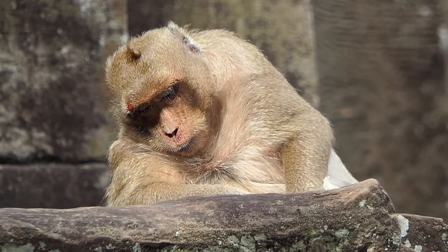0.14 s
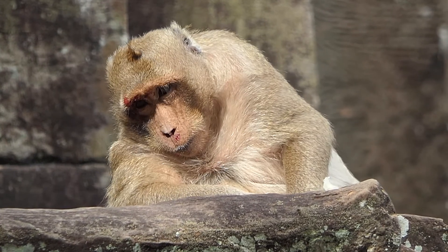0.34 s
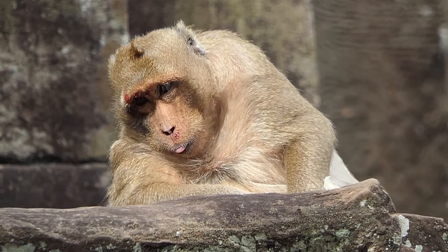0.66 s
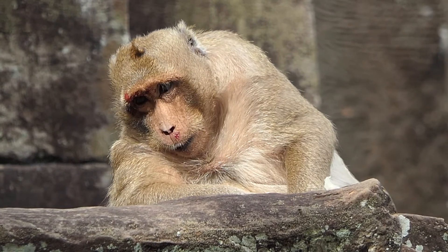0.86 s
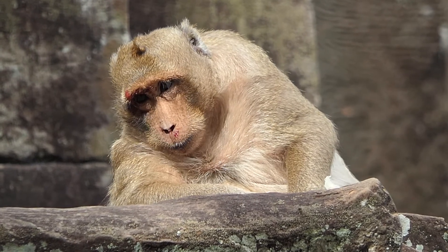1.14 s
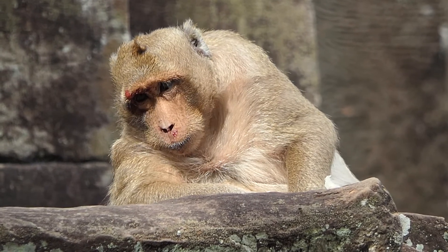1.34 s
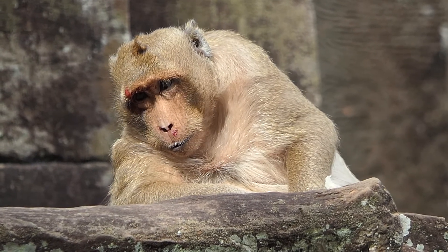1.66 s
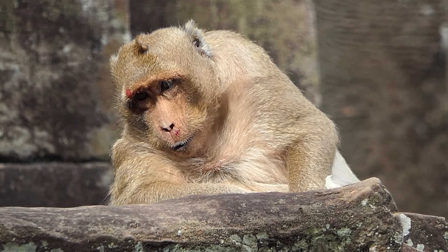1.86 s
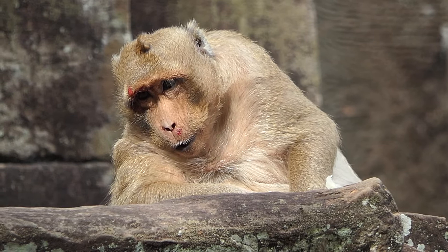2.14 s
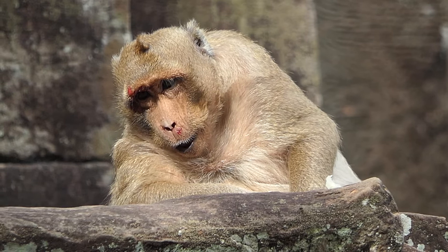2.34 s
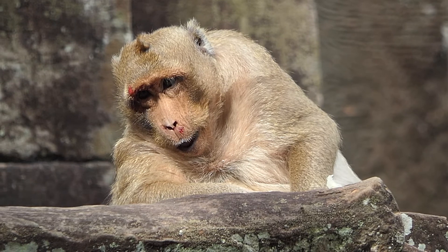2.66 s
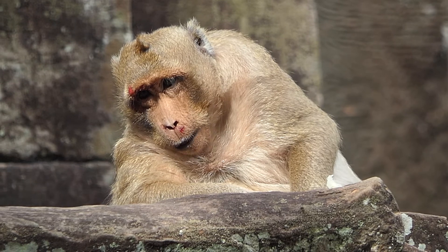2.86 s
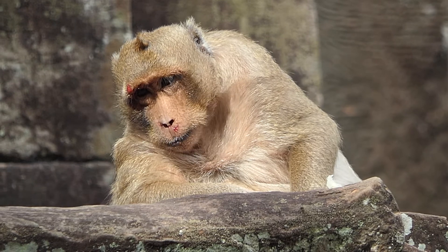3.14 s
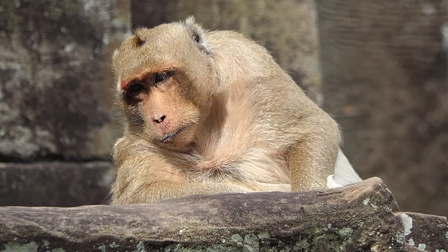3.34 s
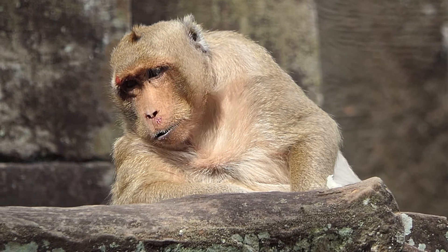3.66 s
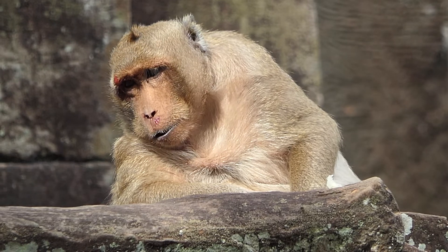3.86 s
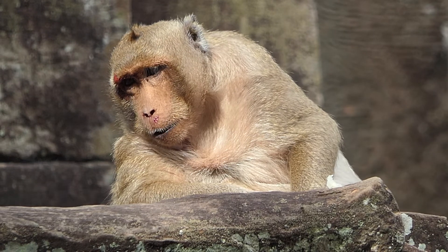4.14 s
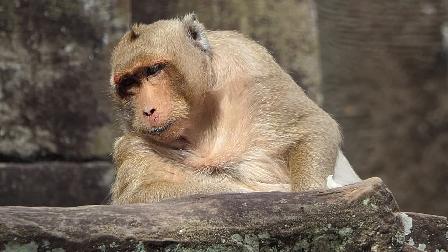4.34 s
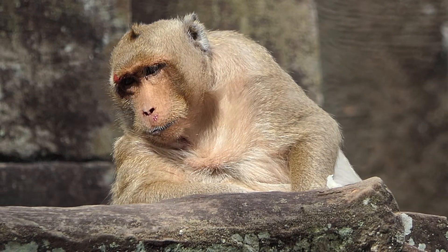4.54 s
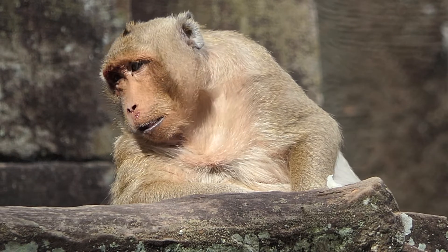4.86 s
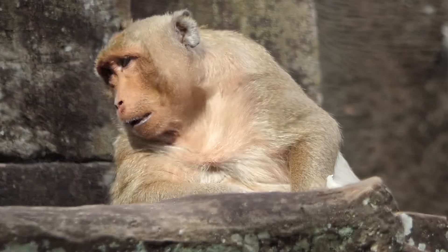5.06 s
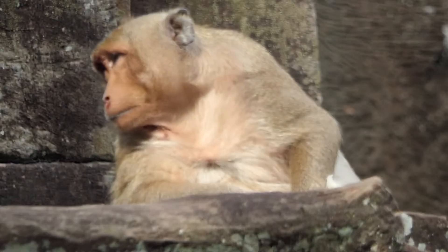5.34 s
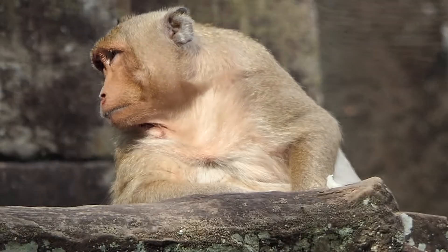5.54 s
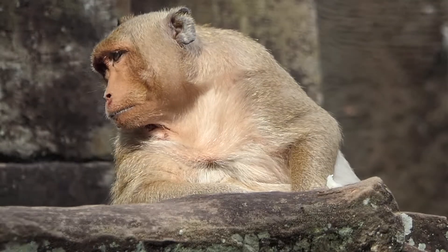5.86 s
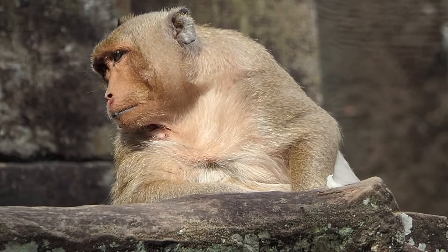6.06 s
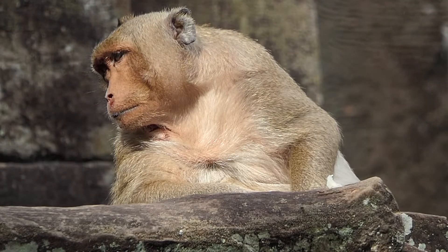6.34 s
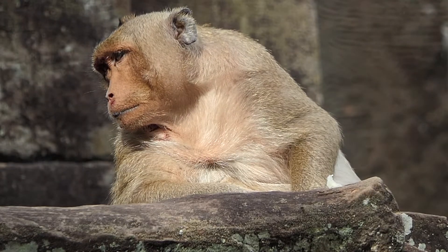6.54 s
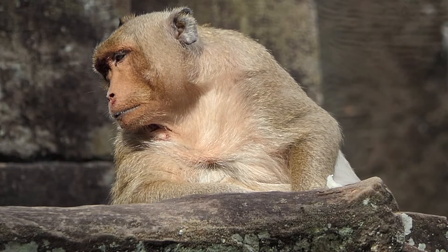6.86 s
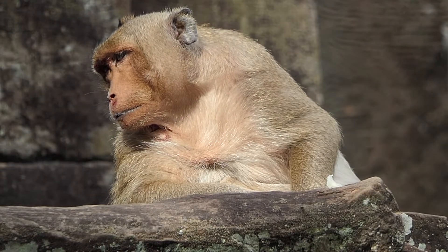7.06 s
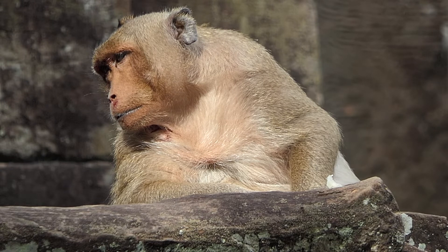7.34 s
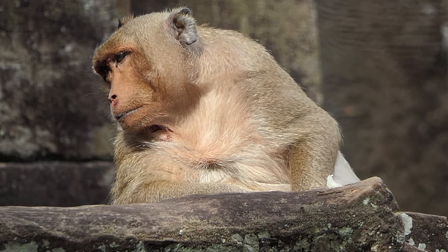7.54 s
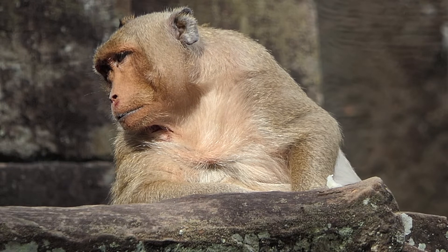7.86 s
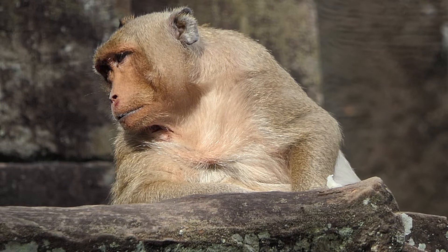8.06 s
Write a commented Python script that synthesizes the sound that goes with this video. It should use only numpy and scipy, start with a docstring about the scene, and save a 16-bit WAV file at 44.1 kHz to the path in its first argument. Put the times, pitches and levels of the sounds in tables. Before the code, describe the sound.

A bird repeats short down-and-up calls over soft leafy hiss and far hum, while something dry rustles and snaps close by.

```python
"""The tail of a bird call dies away under a dry rustle; then ticks, a distant pipe and more near calls follow.
The calls are thin down-and-up whistles: swept tones, blurred by leaves and smeared by echoes off walls and
trees. Piping, gliding notes (mostly faint, with a loud run near the end), some perhaps birds, and a hoarse
animal (trembling tones) sound further off. Knocks are damped modes; rustle and ticks are shaped noise near the
microphones. Traffic hum, forest air and a faint broad noise that differs between the sides are filtered noise."""
import sys
import numpy as np
from scipy import signal
from scipy.fft import rfft, irfft
from scipy.io import wavfile
from scipy.ndimage import uniform_filter1d

SR = 44100
rng = np.random.default_rng(int(sys.argv[2]) if len(sys.argv) > 2 else 0)


def transcribe(u):
    """Save the signal u as a 16-bit wav file named by the first command-line argument.

    u: samples, shape (n,) or (channels, n), limited to [-1, 1]; the rate is SR.
    q: integer samples, one column per channel.
    """
    v = np.clip(np.atleast_2d(u).T, -1, 1)
    q = np.round(v * 32767).astype(np.int16)
    wavfile.write(sys.argv[1], SR, q)


N = 361619
TIME_S = np.arange(N) / SR
FREQ_HZ = np.arange(N // 2 + 1) * SR / N


def undb(db):
    """Decibels to gain."""
    return 10 ** (np.asarray(db) / 20)


def unit(x):
    """Scale to rms 1."""
    return x / np.sqrt(np.mean(x ** 2))


def noise():
    """White noise for the whole scene."""
    return rng.standard_normal(N)


def colour(x, spectrum):
    """Filter by a (Hz, dB) spectrum that falls 10 dB per octave beyond its ends; rms 1."""
    hz, db = np.transpose(spectrum)
    point_octave, octave = np.log2(hz), np.log2(FREQ_HZ + 1)
    octaves_beyond = np.abs(octave - np.clip(octave, point_octave[0], point_octave[-1]))
    gain = undb(np.interp(octave, point_octave, db) - 10 * octaves_beyond)
    return unit(irfft(rfft(x) * gain, N))


def level_at(points):
    """Interpolate (s, dB) points over the scene."""
    return np.interp(TIME_S, *np.transpose(points))


def walk(rate_hz):
    """Random levels held 1 / rate_hz s and slewed twice; spread near 1."""
    hold = int(SR / rate_hz)
    steps = np.repeat(rng.standard_normal(N // hold + 1), hold)
    slewed = uniform_filter1d(uniform_filter1d(steps, hold), hold)
    return unit(slewed[:N])


def quiver(count, size):
    """Fast random flutter, spread near 1: noise averaged twice over size samples."""
    smooth = uniform_filter1d(uniform_filter1d(rng.standard_normal(SR), size), size)
    return unit(smooth)[:count]


def add(out, start_s, sound):
    """Mix a sound in at a time."""
    i = int(start_s * SR)
    out[i:i + len(sound)] += sound[:len(out) - i]


def surroundings(x, wet_db, t60_s, build_s, echo_db, count=14):
    """What comes back: a few distinct echoes off walls, then dense scatter from trunks and leaves."""
    t = TIME_S[:SR]
    scatter = rng.standard_normal(SR) * (1 - np.exp(-t / build_s)) * undb(-60 * t / t60_s)
    lag_s = 0.0068 + 0.12 * (np.arange(count) + rng.random(count)) / count
    echoes = np.zeros(SR)
    echoes[(lag_s * SR).astype(int)] = rng.choice([-1, 1], count) * undb(-60 * lag_s / t60_s)
    response = undb(wet_db) * scatter / np.linalg.norm(scatter)
    response += undb(echo_db) * echoes / np.linalg.norm(echoes)
    return signal.fftconvolve(x, response)[:len(x)]


def whistle(hz, gain, waver, flutter_db=3.0, octave_db=-35):
    """A nearly pure tone that trembles in pitch and strength, with a trace of its octave."""
    trembling_hz = hz * (1 + waver * quiver(len(hz), size=70))
    phase = 2 * np.pi * np.cumsum(trembling_hz) / SR
    flutter = unit(undb(flutter_db * quiver(len(hz), size=220)))
    tone = np.sin(phase) + undb(octave_db) * np.sin(2 * phase)
    return np.sqrt(2) * gain * flutter * tone


def glides(notes, waver):
    """Straight slides in pitch that swell and fade."""
    out = np.zeros(N)
    for start_s, length_s, start_hz, end_hz, db in notes:
        n = int(length_s * SR)
        envelope = undb(db) * signal.windows.tukey(n, 0.5)
        add(out, start_s, whistle(np.linspace(start_hz, end_hz, n), envelope, waver))
    return out


# hum spectrum: (frequency [Hz], relative density [dB])
HUM_SPECTRUM = [(25, -36), (40, -34), (52, -19), (70, -12.5), (95, -7), (115, 1), (150, -1), (175, -4),
                (205, -7), (300, -12), (350, -19), (450, -29)]
# hum contour: (time [s], level [dB])
HUM_LEVEL = [(0, -55.5), (2, -54), (2.9, -53), (3.35, -57.5), (4.1, -56), (4.9, -54), (6.3, -53),
             (6.6, -56.5), (8.2, -55)]
# bands of far engines and tyres: (centre [Hz], half width [Hz], level [dB])
DRONE_BANDS = [(147, 18.3, -60.5), (532, 36.4, -72.5), (623, 290, -76), (978, 103, -66.5)]


def traffic():
    """Distant traffic: a low hum of filtered noise and a few resonant bands that wander in level."""
    out = colour(noise(), HUM_SPECTRUM) * undb(level_at(HUM_LEVEL) + 0.5 * walk(10))
    for hz, half_width_hz, band_db in DRONE_BANDS:
        resonance = 1 / (1 + ((FREQ_HZ - hz) / half_width_hz) ** 2)
        band = unit(irfft(rfft(noise()) * resonance, N))
        out += band * undb(band_db + 1.9 * walk(4.02))
    return out


# forest air spectrum: (frequency [Hz], relative density [dB])
AIR_SPECTRUM = [(410, -38), (700, -13.5), (1090, -3.5), (1300, -4), (1580, -4), (1800, -7.5), (2400, -7),
                (3820, -9.5), (4180, -7.5), (5640, -6), (6090, -5.5), (6500, -10), (8650, -16.5),
                (10100, -14), (15500, -47)]
# forest air contour: (time [s], level [dB])
AIR_LEVEL = [(0, -59.5), (1, -57.5), (1.25, -58.5), (2.9, -56), (3.6, -57), (4.9, -57), (5.8, -56),
             (6.8, -55.5), (8.2, -56.5)]


def forest_air(patchy_db=2.0):
    """Hiss of distant leaves and insects: it swells as a whole, and each narrow band stirs on its own."""
    bands = signal.stft(colour(noise(), AIR_SPECTRUM), nperseg=512)[2]
    stir = uniform_filter1d(rng.standard_normal(bands.shape), size=24, axis=1)  # along time
    stir = unit(uniform_filter1d(stir, size=2, axis=0))  # across bands
    air = signal.istft(bands * undb(patchy_db * stir))[1][:N]
    return unit(air) * undb(level_at(AIR_LEVEL) + 0.61 * walk(25))


# faint broad noise that differs between the two sides: (frequency [Hz], relative density [dB])
SIDE_SPECTRUM = [(25, 6.5), (100, 6.5), (310, 11), (420, 3), (520, 9), (650, 3), (1000, 6.5), (2000, -3.5),
                 (4000, -2), (5500, 2.5), (7500, 1)]
SIDE_DB = -76


def side_noise():
    """Faint broad filtered noise, to be added on one side and subtracted on the other."""
    return undb(SIDE_DB) * colour(noise(), SIDE_SPECTRUM)


CHATTER_LOW_HZ, CHATTER_HIGH_HZ = 1452, 2660
CHATTER_S, CHATTER_DB = 0.1206, -67.5
CHATTER_FALL = 0.94  # end pitch / start pitch


def chatter(count=7):
    """Faint falling notes at random times and pitches, from deep in the forest."""
    notes = []
    for when, pitch in rng.random((count, 2)):
        hz = CHATTER_LOW_HZ + pitch * (CHATTER_HIGH_HZ - CHATTER_LOW_HZ)
        notes.append((when * N / SR, CHATTER_S, hz, hz * CHATTER_FALL, CHATTER_DB))
    return notes


# low gliding tones and high slurred notes, some perhaps birds, mostly faint but with a loud closing run near
# 7.9 s: # (time [s], length [s], start pitch [Hz], end pitch [Hz], source level [dB])
GLIDING_NOTES = [(2.04, .16, 4270, 4130, -57.5), (2.977, 0.11, 4930, 4170, -62),
                 (4.19, .24, 1420, 1278, -65), (4.40, .03, 10750, 10270, -55),
                 (4.52, .03, 10500, 9700, -67), (4.65, 0.024, 10300, 9700, -66),
                 (5.96, 0.079, 2420, 2265, -62.5), (6.985, 0.091, 6440, 5570, -57),
                 (7.69, 0.045, 11900, 11600, -71), (7.8, .05, 12000, 11500, -73),
                 (8.07, 0.037, 12500, 11900, -70), (7.865, .022, 6100, 5380, -45.5),
                 (7.88, 0.024, 5250, 4910, -41), (7.917, 0.024, 4800, 3980, -47),
                 (7.942, 0.025, 5800, 5330, -47), (7.995, 0.055, 5200, 4000, -48)]
# nearly level notes of one distant bird: (time [s], length [s], source level [dB])
PIPED_NOTES = [(0.45, 0.13, -57), (3.42, 0.31, -59), (5.448, 0.164, -58), (6.164, 0.077, -62)]
PIPE_START_HZ, PIPE_END_HZ = 5220, 5290
GLIDE_QUIVER, PIPE_QUIVER = 0.04, 0.03  # share of the pitch


def far_notes():
    """Trembling glides, some perhaps birds, and a bird's steadier piping, heard mostly by way of the trees."""
    pipes = [(s, length_s, PIPE_START_HZ, PIPE_END_HZ, db) for s, length_s, db in PIPED_NOTES]
    notes = glides(GLIDING_NOTES + chatter(), GLIDE_QUIVER) + glides(pipes, PIPE_QUIVER)
    straight_db = -6
    returned = surroundings(notes, wet_db=-0.5, t60_s=1.5, build_s=0.0028, echo_db=-9.0)
    return undb(straight_db) * notes + returned


# low, hoarse call: (time [s], length [s], start pitch [Hz], end pitch [Hz], core level before echo [dB])
HOARSE_NOTES = [(5.615, .06, 1098, 910, -60.5), (5.725, 0.029, 894, 890, -60),
                (5.76, 0.029, 800, 740, -56.5), (5.81, .07, 783, 900, -61), (5.88, 0.053, 790, 743, -57.5),
                (5.97, .04, 816, 850, -65), (6.018, 0.04, 780, 952, -58.5)]
CORE_QUIVER, RASP_QUIVER = 0.06, 0.2  # share of the pitch
RASP_DB = -1  # relative to the core


def hoarse_caller():
    """A larger animal far off: low notes, each a clear core in a rasp, run together by the echo."""
    core = glides(HOARSE_NOTES, CORE_QUIVER)
    rasp = undb(RASP_DB) * glides(HOARSE_NOTES, RASP_QUIVER)
    voice = core + rasp
    return voice + surroundings(voice, wet_db=-1.0, t60_s=0.8, build_s=0.005, echo_db=-10.0)


# dull knocks: (time [s], peak before echo [dB], pitch [Hz], time to -60 dB [s])
KNOCK_EVENTS = [(1.345, -50, 1070, 0.022), (1.54, -52, 1020, .02), (2.712, -45, 1050, .04),
                (3.723, -47, 970, 0.019), (4.333, -40, 930, 0.009), (5.555, -51, 620, 0.02),
                (7.512, -45, 620, 0.02)]


def knocks():
    """Each knock rings one damped mode and a shorter, weaker overtone."""
    out, t = np.zeros(N), TIME_S[:4096]
    onset = 1 - np.exp(-t / 0.00051)
    for start_s, db, hz, t60_s in KNOCK_EVENTS:
        fade = undb(-60 * t / t60_s)
        mode = fade * np.sin(2 * np.pi * hz * t)
        overtone = 0.56 * fade ** 2 * np.sin(2 * np.pi * 1.44 * hz * t)
        ring = (mode + overtone) * onset
        add(out, start_s, undb(db) * ring / np.abs(ring).max())
    return out + surroundings(out, wet_db=-3.0, t60_s=0.83, build_s=0.0086, echo_db=-17)


# rustling strokes: (peak time [s], swell [s], fade [s], brushing level [dB], dull body level [dB])
RUSTLE_STROKES = [(.08, 0.33, 0.47, -55, -56.5), (.441, 0.022, 0.12, -58.5, -59),
                  (.5, 0.028, 0.058, -70, -56), (.95, 0.15, 0.38, -61, -59.5), (1.9, 0.11, 0.13, -59, -59),
                  (2.012, 0.039, 0.05, -48, -52.5), (2.12, 0.079, 0.069, -54.5, -56),
                  (2.21, 0.1, 0.055, -54.5, -51), (2.67, 0.089, 0.32, -49.5, -52),
                  (2.92, 0.061, .03, -72, -58), (5.19, 0.04, 0.069, -56, -71),
                  (5.3, 0.084, 0.072, -55, -70), (5.375, 0.036, 0.24, -57, -64),
                  (5.8, 0.12, 0.33, -62.5, -73), (6.48, 0.046, 0.11, -58, -60.5),
                  (8.111, 0.11, 0.18, -57.5, -57)]
# brushing spectrum: (frequency [Hz], relative density [dB])
BRUSH_SPECTRUM = [(2500, -26), (4200, -4.5), (6000, 0.5), (7500, -7), (10000, -3.5), (12000, -12),
                  (15500, -25)]
# dull body spectrum: (frequency [Hz], relative density [dB])
BODY_SPECTRUM = [(400, -8.5), (1000, 6), (2000, 6), (3000, 6), (4200, 8), (5500, 0), (8000, -36)]
# brushing that differs between the microphones: (frequency [Hz], relative density [dB])
BRUSH_SIDE_SPECTRUM = [(2000, -12), (5500, -6), (8000, -11), (9800, 0), (12000, -4), (15500, -13)]
BRUSH_SIDE_DB = -11.5  # relative to the brushing


def rustle(grain_db=4.5, clump_db=1.0):
    """Dry surfaces brush: tiny slips in uneven clumps, with a duller body; gives middle and side."""
    brush, body = np.zeros(N), np.zeros(N)
    for peak_s, swell_s, fade_s, brush_db, body_db in RUSTLE_STROKES:
        from_peak_s = TIME_S - peak_s
        stroke = np.exp(-np.where(from_peak_s < 0, (from_peak_s / swell_s) ** 2, from_peak_s / fade_s))
        brush = np.hypot(brush, undb(brush_db) * stroke)
        body = np.hypot(body, undb(body_db) * stroke)
    slips = undb(grain_db * noise() + clump_db * walk(300))
    middle = brush * colour(slips * noise(), BRUSH_SPECTRUM) + body * colour(slips * noise(), BODY_SPECTRUM)
    side = brush * undb(BRUSH_SIDE_DB) * colour(slips * noise(), BRUSH_SIDE_SPECTRUM)
    return middle, side


# clearest dry ticks: (time [s], peak before the low-pass [dB], nominal centre [Hz])
TICK_EVENTS = [(.427, -38, 3100), (.597, -41, 3270), (.776, -41, 3220), (.834, -40, 2600),
               (1.772, -42, 1400), (2.016, -33.5, 7000), (2.647, -34, 3600), (2.663, -33, 2490),
               (2.712, -37.5, 2600), (3.272, -38.5, 4500), (3.701, -45, 2510), (3.722, -36.5, 3400),
               (4.386, -48, 2500), (4.401, -42, 6000), (4.419, -41, 4000), (4.988, -42, 9000),
               (5.199, -41, 8000), (5.677, -42, 3100), (7.511, -49, 1500), (7.752, -43, 2000)]
STROKE_TICK_DB, STROKE_TICK_HZ = 1, 6500  # peak relative to the brushing, nominal centre


def ticks(decay_s=0.0027, crumble_s=0.014, crumble_db=-15, soft_hz=10000, count=2):
    """Small dry snaps, alone or scattered around strokes: a sharp crack and a brief crumble, softened on top."""
    out, t = np.zeros(N), TIME_S[:2048]
    scattered = []
    for peak_s, swell_s, _, brush_db, _ in RUSTLE_STROKES:
        for when in rng.uniform(-0.33, 1, count):
            scattered.append((abs(peak_s + when * swell_s), brush_db + STROKE_TICK_DB, STROKE_TICK_HZ))
    fade = np.exp(-t / decay_s) + undb(crumble_db) * np.exp(-t / crumble_s)
    for start_s, db, hz in TICK_EVENTS + scattered:
        edges_hz = [hz / 2.3, min(hz * 1.6, SR / 2 - 1)]
        b, a = signal.butter(1, edges_hz, "band", fs=SR)
        crack = signal.lfilter(b, a, rng.standard_normal(len(t)) * fade)
        add(out, min(start_s, TIME_S[-1]), undb(db) * crack / np.abs(crack).max())
    return signal.sosfilt(signal.butter(4, soft_hz, fs=SR, output="sos"), out)


FALL_BEND, RISE_BEND = 1.04, 1.22  # exponents of the pitch curves
FLICK_HZ, FLICK_S = 602, 0.00496  # initial pitch deficit and its time constant
BREAK_HEIGHT, BREAK_WIDTH = 0.24, 0.05  # where the level drops: 0 = bottom pitch, 1 = top
TOP_DB, RISE_DB = -11, -1.26  # thinning at the top; rising stroke relative to falling


def swoop(length_s, first_hz, bottom_hz, last_hz, turn, bottom_db):
    """Pitch, level and lowness (0-1) of a call: a flick up, a falling stroke, a soft turn, a rising stroke."""
    u = np.linspace(0, 1, int(length_s * SR))
    falling = u < turn
    bend = np.where(falling, FALL_BEND, RISE_BEND)
    height = np.interp(u, [0, min(turn, 0.9), 1], [1, 0, 1]) ** bend
    top_hz = np.where(falling, first_hz, last_hz)
    flick_hz = FLICK_HZ * np.exp(-u * length_s / FLICK_S)
    hz = bottom_hz + height * (top_hz - bottom_hz) - flick_hz
    low = 0.5 - 0.5 * np.tanh((height - BREAK_HEIGHT) / BREAK_WIDTH)
    high = np.clip(2 * height - 1, 0, 1) ** 2
    shape_db = bottom_db * low + TOP_DB * high + np.where(falling, 0, RISE_DB)
    return hz, shape_db, low


CLEAR_DB, SMEAR_DB, SMEAR_S = 0.5, -5, 0.009  # clear part, scattered part, its time constant


def through_leaves(x):
    """Leaves beside the straight path scatter the sound, so that each stroke is blurred and beaded."""
    scatter = rng.standard_normal(4096) * np.exp(-TIME_S[:4096] / SMEAR_S)
    smeared = signal.fftconvolve(x, scatter / np.linalg.norm(scatter))[:len(x)]
    return undb(CLEAR_DB) * x + undb(SMEAR_DB) * smeared


# near calls: (time [s], length [s], first top [Hz], bottom [Hz], last top [Hz], turn [share of length],
#              level before contour and paths [dB], straight path [dB], attack [s], turn level [dB])
NEAR_CALLS = [(-.3, 0.18, 6840, 4900, 7370, 0.44, -50, 0, .01, 0),
              (1.074, 0.222, 7050, 4840, 7450, 0.48, -51, 2.5, 0.0099, -5),
              (1.725, .14, 6600, 5200, 5400, .9, -60.5, 3.5, .008, -2),
              (2.407, 0.2, 6960, 4840, 7250, 0.55, -50, 2.5, .008, -7),
              (3.724, .213, 7110, 4840, 7540, 0.5, -50.5, 2.5, 0.0097, -6),
              (4.926, .217, 6930, 4875, 7330, 0.47, -51.5, 3.5, 0.011, -7),
              (6.332, .22, 7150, 4770, 7350, .46, -50.5, -3, 0.0087, -4.5),
              (7.331, 0.19, 6450, 5043, 7040, 0.57, -42.5, -0.5, 0.02, -0.5),
              (7.551, .21, 6830, 4890, 7460, 0.49, -54, 4.5, .012, -6)]
CALL_QUIVER = 0.007  # share of the pitch
TURN_PATH_DB = -6  # straight path during the turn


def near_birds():
    """Each call is two strokes, down and up; the soft turn between them arrives mostly as echo."""
    lead_s = 1  # an earlier call is still dying away at the start
    sung, straight = np.zeros((2, N + lead_s * SR))
    for start_s, length_s, first_hz, bottom_hz, last_hz, turn, db, path_db, attack_s, bottom_db in NEAR_CALLS:
        hz, shape_db, low = swoop(length_s, first_hz, bottom_hz, last_hz, turn, bottom_db)
        attack = np.minimum(TIME_S[:len(hz)] / attack_s, 1)
        envelope = attack * signal.windows.tukey(len(hz), 0.06)
        call = whistle(hz, envelope * undb(db + shape_db), waver=CALL_QUIVER)
        add(sung, start_s + lead_s, call)
        add(straight, start_s + lead_s, undb(path_db + TURN_PATH_DB * low) * call)
    returned = surroundings(sung, wet_db=3.5, t60_s=1.65, build_s=0.0086, echo_db=0.0)
    return (through_leaves(straight) + returned)[lead_s * SR:]


def scene():
    """Sources arrive alike on both sides, except part of the rustle and a faint broad noise."""
    rustle_middle, rustle_side = rustle()
    background = traffic() + forest_air() + far_notes() + hoarse_caller() + knocks()
    middle = background + rustle_middle + ticks() + near_birds()
    side = rustle_side + side_noise()
    return np.array([middle + side, middle - side])


# microphone hiss: (frequency [Hz], relative density [dB])
HISS_SPECTRUM = [(6000, -31), (7800, -42), (9500, -2), (11000, -6.5), (13000, -10.5), (15500, -13.5)]
LEFT_HISS_DB, RIGHT_HISS_DB = -67.5, -70.0
TOP_HZ = 15600


def record(dry):
    """Each microphone adds its own faint hiss; a steep low-pass cuts the top."""
    left_hiss = undb(LEFT_HISS_DB) * colour(noise(), HISS_SPECTRUM)
    right_hiss = undb(RIGHT_HISS_DB) * colour(noise(), HISS_SPECTRUM)
    low_pass = signal.ellip(10, 0.2, 70, TOP_HZ, fs=SR, output="sos")
    return signal.sosfilt(low_pass, dry + np.array([left_hiss, right_hiss]))


dry = scene()
out = record(dry)
transcribe(out)
```